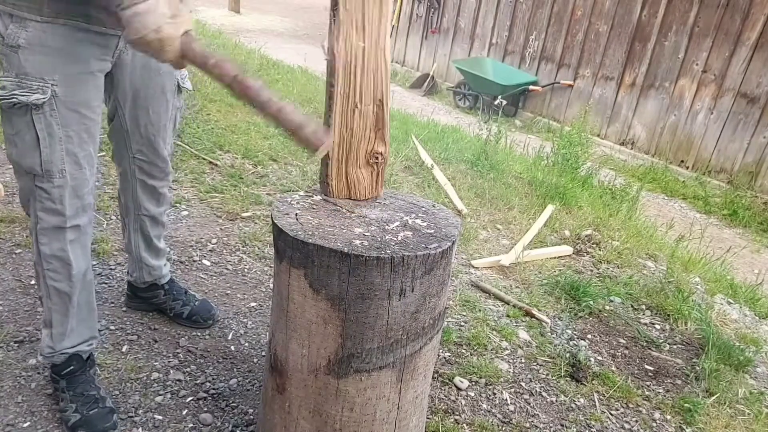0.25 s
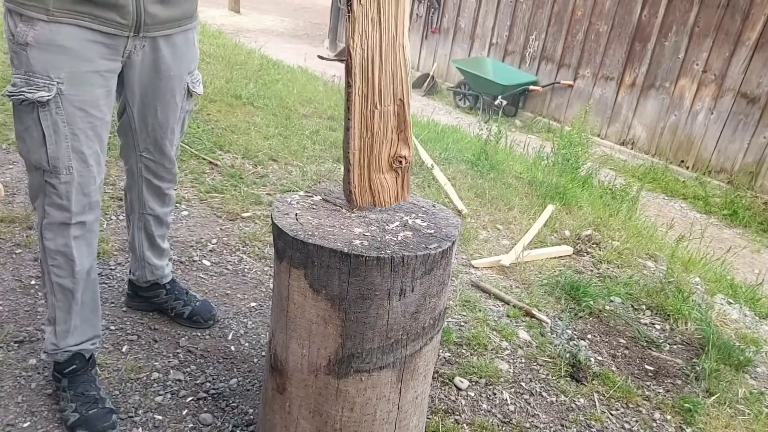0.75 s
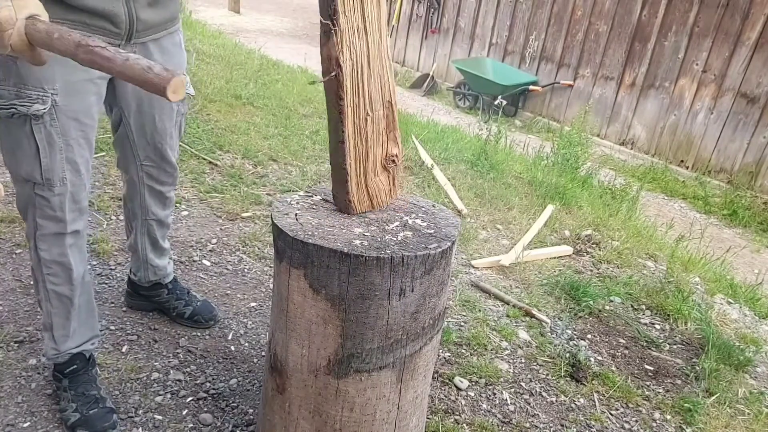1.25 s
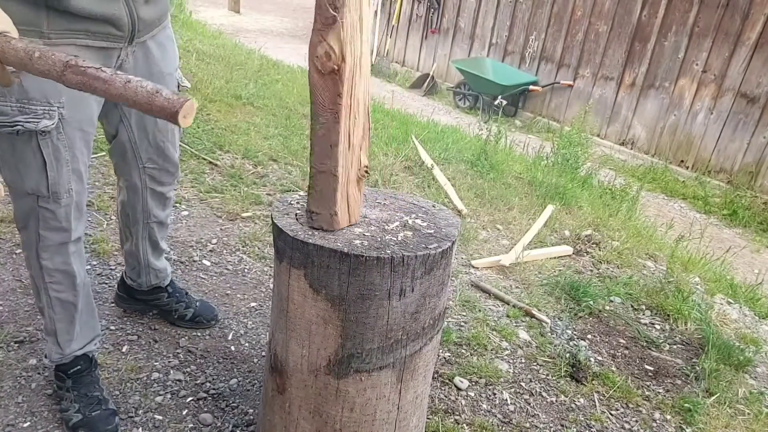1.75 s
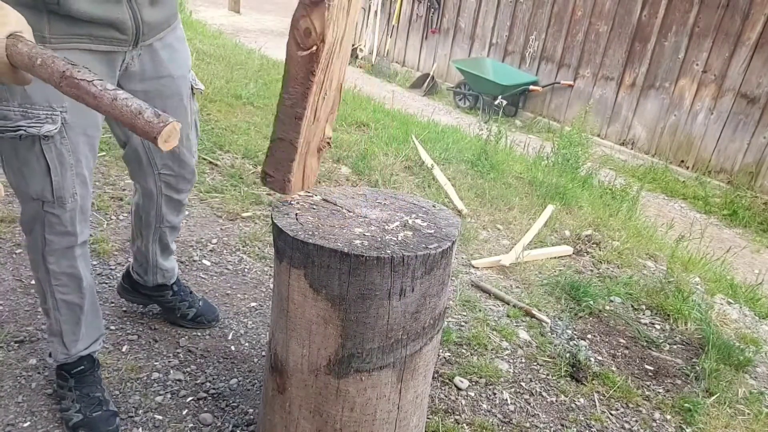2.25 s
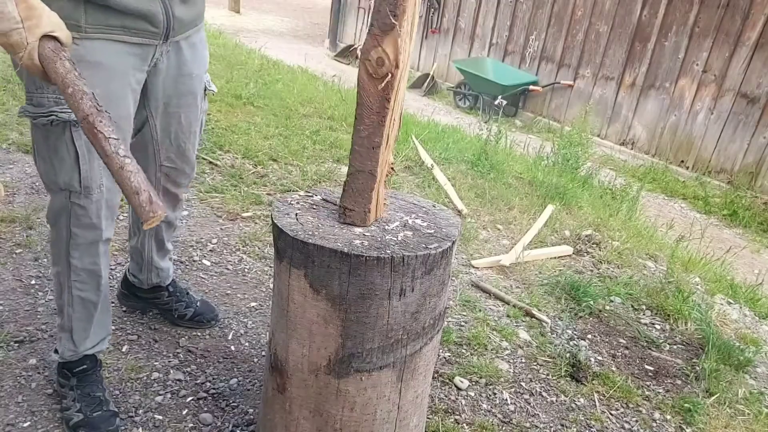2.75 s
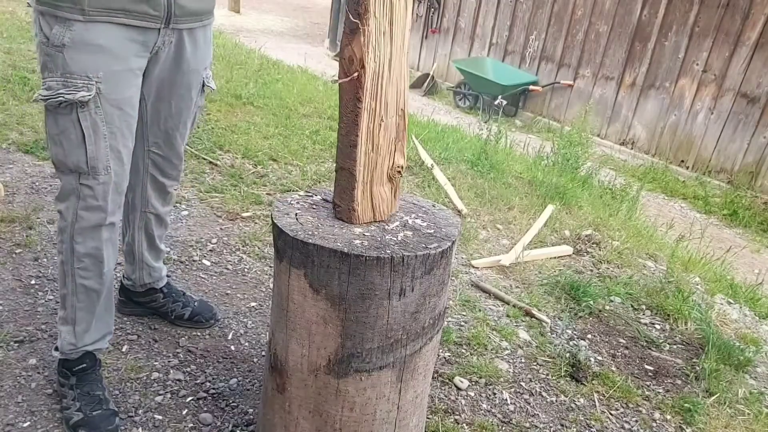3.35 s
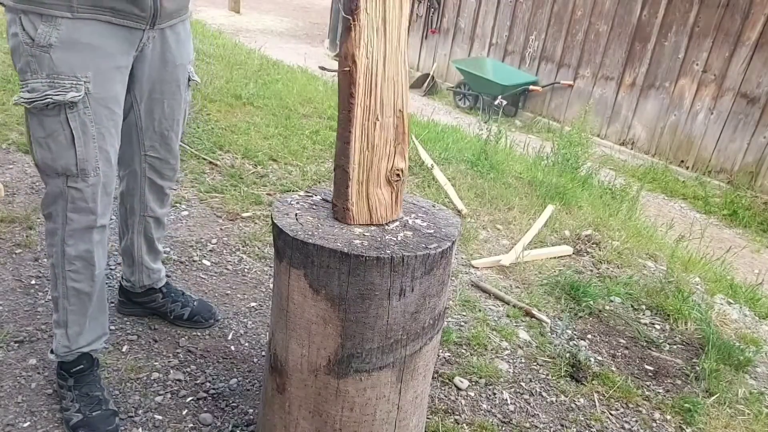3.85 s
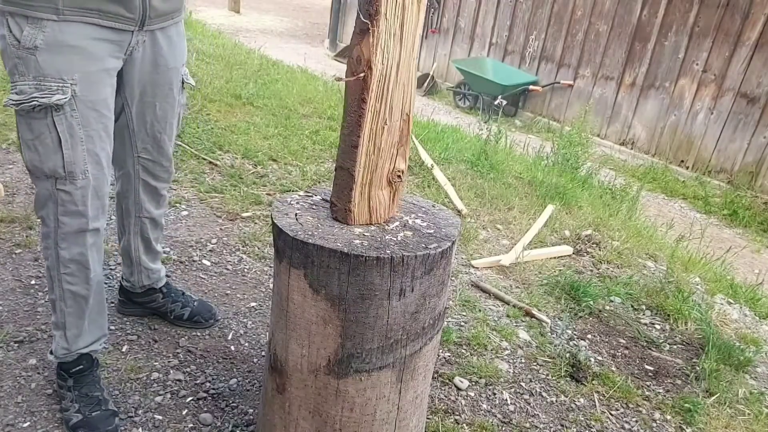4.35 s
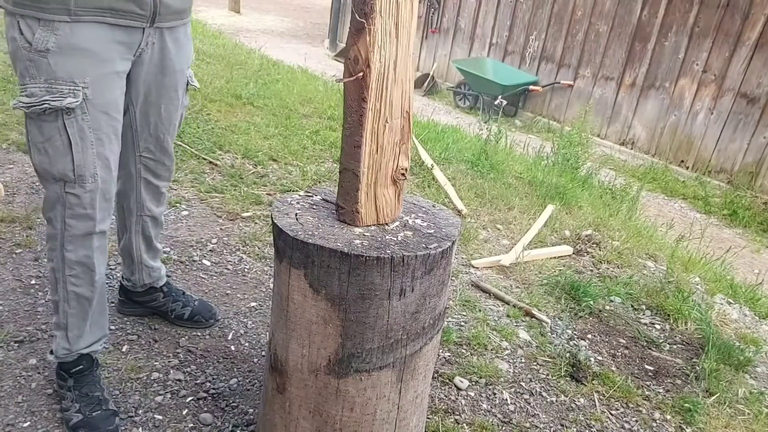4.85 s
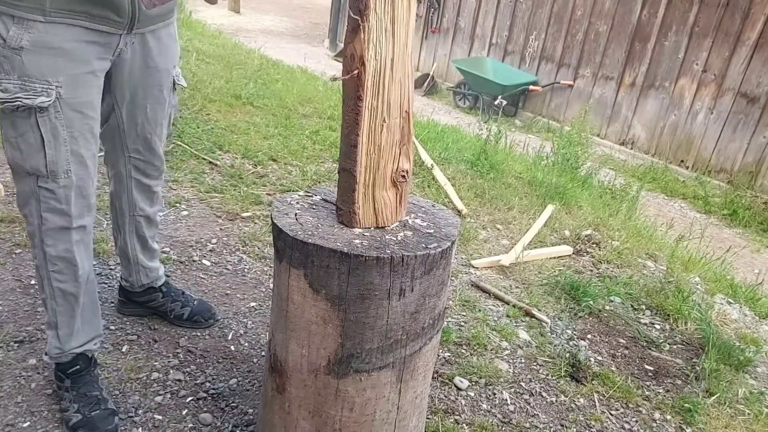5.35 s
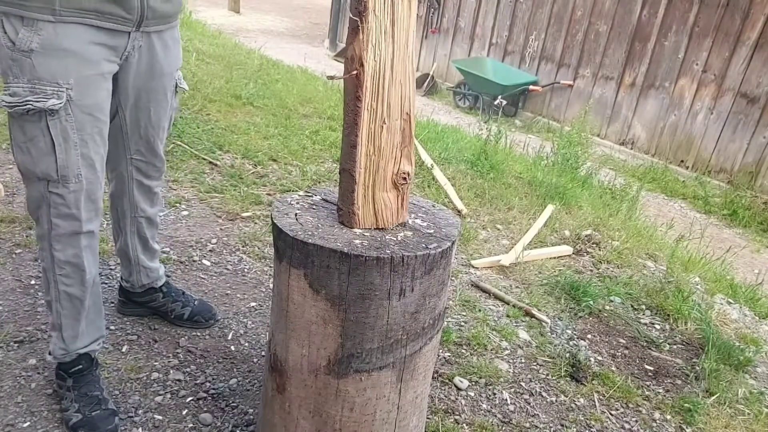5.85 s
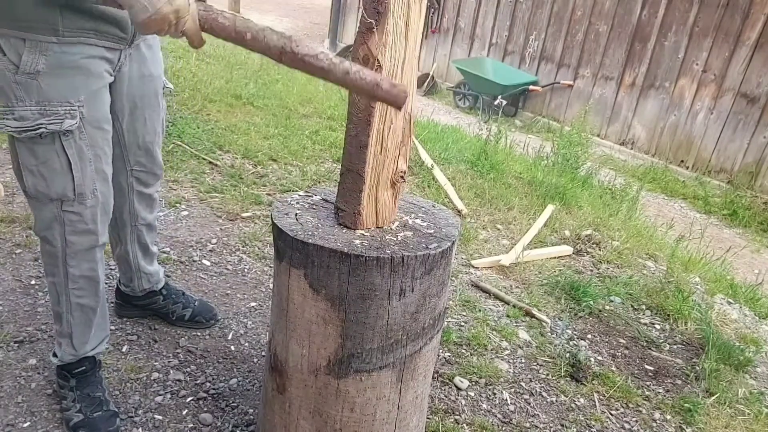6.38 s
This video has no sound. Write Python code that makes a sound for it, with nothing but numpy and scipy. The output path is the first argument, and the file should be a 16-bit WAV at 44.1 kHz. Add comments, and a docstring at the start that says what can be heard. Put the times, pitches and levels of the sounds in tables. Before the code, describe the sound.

At about 0.4 seconds a wooden club hits a knife set in a log, a close, sharp knock with a brief metallic edge and a short outdoor echo. The log taps softly on the stump beneath it at 1 second, drops on it with a loud double clack near 1.9 seconds, and bumps again more lightly at 2.8 seconds. Small ticks and scuffs of bark, hands and cloth follow. Three hard club blows land at about 3.9, 4.8 and 5.5 seconds, each a bright crack with a woody thud. Near 6.5 seconds there is a short scrape with two quick, sharp clicks. Small birds whistle faintly in the distance, mostly during the first three and a half seconds. Under everything lies a very quiet hiss of air and a far traffic rumble that swells slightly around 1.6 seconds.

```python
"""A wooden club drives a knife down a split log that stands on a stump in a yard.
Each blow, or drop of the log, rings blade, log and stump as short damped modes; the ground
shudders, and a fence and walls throw the sound back. Wood, hands and cloth tick and scuff.
Small birds whistle far off over a noise bed: air, a low drone, distant traffic, a faint whine."""
import sys
import numpy as np
from scipy import signal
from scipy.fft import rfft
from scipy.io import wavfile
from scipy.ndimage import uniform_filter1d

SR = 44100
rng = np.random.default_rng(int(sys.argv[2]) if len(sys.argv) > 2 else 0)


def pcm_store(signal):
    """Save signal as 16-bit PCM."""
    levels = np.round(np.clip(np.atleast_2d(signal), -1, 1) * 32767)
    wavfile.write(sys.argv[1], SR, levels.astype(np.int16).T)


N = 291942


def gain(db):
    """Decibels to amplitude."""
    return 10 ** (np.asarray(db) / 20)


def unit_rms(x):
    """Scales to rms 1."""
    return x / np.sqrt(np.mean(x ** 2) + 1e-20)


def at_hz(table, hz):
    """Interpolates a table over log frequency."""
    table_hz, value = np.transpose(table)
    return np.interp(np.log(hz + 1), np.log(table_hz + 1), value)


def envelope(levels):
    """Gain per sample from rows of time_s, level_db."""
    return gain(np.interp(np.arange(N) / SR, *np.transpose(levels)))


def add(mix, start_s, sound):
    """Mixes a sound in at start_s."""
    part = mix[max(round(start_s * SR), 0):][:len(sound)]
    part += sound[:len(part)]


def resonate(x, hz, width_hz, passes=2):
    """Band-pass, fixed or gliding: shift hz to zero, smooth, shift back."""
    carrier = np.exp(2j * np.pi * np.cumsum(hz * np.ones(len(x))) / SR)
    pole = np.exp(-np.pi * width_hz / SR)
    for _ in range(passes):
        x = 2 * (carrier * signal.lfilter([1 - pole], [1, -pole], x / carrier)).real
    return x


def band_noise(samples, hz, width_hz):
    """Noise around hz, rms 1."""
    return unit_rms(resonate(rng.standard_normal(samples), hz, width_hz))


# left-right likeness: freq_hz, correlation
COHERENCE = [(60, 1), (300, 1), (3500, 1), (6000, 1), (15000, 0.78)]

def wash(spectrum, levels, band_hz, patch_db):
    """Stereo noise with drifting spectral patches; levels apply within band_hz."""
    frames, hz = N // 256 + 5, np.fft.rfftfreq(1024, 1 / SR)
    a, b, c, d, patches = rng.standard_normal((frames, 513, 5)).T
    patches = unit_rms(uniform_filter1d(uniform_filter1d(patches, 10, 0), 14, 1))
    coherence = np.clip(at_hz(COHERENCE, hz), -1, 1)[:, None]
    left = a + 1j * b
    right = coherence * left + np.sqrt(1 - coherence ** 2) * (c + 1j * d)
    shape = gain(at_hz(spectrum, hz))
    in_band = (hz > band_hz[0]) & (hz < band_hz[1])
    band_share = np.linalg.norm(shape[in_band]) / np.linalg.norm(shape)
    spectra = np.array([left, right]) * shape[:, None] * gain(patch_db * patches)
    noise = signal.istft(spectra, nperseg=1024, noverlap=768)[1][:, :N]
    return unit_rms(noise) / band_share * envelope(levels)


# air and drone spectra: freq_hz, density_db
AIR_SPECTRUM = [(30, -39.5), (60, -11), (120, -2.5), (250, -9), (500, -12.5), (1200, -8), (2000, -12.5),
                (2600, -14.5), (3500, -10), (5000, -8.5), (8000, -12.5), (11400, -15.5), (12000, -23.5),
                (13500, -20), (16000, -27)]
DRONE_SPECTRUM = [(25, -37), (42, -12), (60, 3), (80, -6), (160, -16), (300, -39.5)]
# their levels: time_s, level_db
AIR_LEVELS = [(0, -74.5), (1.499, -72), (3.001, -70), (3.9, -70), (4.301, -74), (5.501, -73), (6.62, -72)]
DRONE_LEVELS = [(0, -83), (2.199, -77), (3.2, -78.5), (4.598, -84), (6.62, -81)]

def air():
    """Broad hiss, a low drone and a faint steady whine."""
    hiss = wash(AIR_SPECTRUM, AIR_LEVELS, band_hz=(4500, 11000), patch_db=1.7)
    drone = wash(DRONE_SPECTRUM, DRONE_LEVELS, band_hz=(30, 160), patch_db=1.3)
    whine = gain(-89) * band_noise(N, hz=13550, width_hz=150)
    return hiss + drone + whine


# traffic spectrum: freq_hz, density_db
TRAFFIC_SPECTRUM = [(90, -29), (200, -1), (350, 0), (700, -1), (1100, -1.5), (1500, -15), (2500, -33.5)]
# traffic level: time_s, level_db
TRAFFIC_LEVELS = [(0, -73), (.35, -74.5), (.8, -68), (1.2, -69), (1.6, -63), (1.85, -67), (2.5, -75.5),
                  (3.1, -74.5), (3.7, -81.5), (6.3, -85), (6.62, -73.5)]

def traffic():
    """Far traffic: a rumble that swells and fades."""
    return wash(TRAFFIC_SPECTRUM, TRAFFIC_LEVELS, band_hz=(180, 1300), patch_db=0.98)


def whistle(hz, db, noise_share=0.4, taper=0.5):
    """A note blurred by distance: a tone plus narrow noise on the same pitch."""
    tone = np.sqrt(2) * np.sin(2 * np.pi * np.cumsum(hz) / SR)
    fuzz = band_noise(len(hz), hz, width_hz=160)
    note = np.sqrt(1 - noise_share) * tone + np.sqrt(noise_share) * fuzz
    return gain(db) * note * signal.windows.tukey(len(hz), taper)


def slide(length_s, from_hz, to_hz, settle_s=0.043):
    """Pitch curve settling exponentially on to_hz."""
    return to_hz + (from_hz - to_hz) * np.exp(-np.arange(0, length_s, 1 / SR) / settle_s)


# farther birds: time_s, level_db
CHORUS_LEVELS = [(0, -77.5), (.6, -72.5), (0.901, -68), (1.3, -72.5), (1.8, -75), (2.3, -70.5),
                 (3.301, -72), (3.7, -80), (4.8, -88), (5.3, -77.5), (6.62, -76.5)]

def chorus():
    """Farther birds: short, noisy slides at random times."""
    out = np.zeros(N)
    for when, length, height, bend, loudness in rng.random((420, 5)):
        to_hz = 2850 + 1100 * height ** 0.89
        hz = slide(0.025 + 0.028 * length, to_hz * (0.69 + 0.55 * bend), to_hz)
        add(out, when * N / SR, whistle(hz, 5 * loudness, noise_share=0.85))
    return unit_rms(out) * envelope(CHORUS_LEVELS)


# held note slurring up: slur_s, before_s, after_s, low_db, top_db
BIRD_SLURS = [(.093, .093, .15, -63.5, -72.5), (.958, .123, 0.1, -55.5, -70), (1.65, .272, .22, -58, -67.5)]
# second bird's thin falling calls: start_s, length_s, level_db
BIRD_PEEPS = [(0.367, 0.063, -67), (0.858, 0.14, -69.5), (1.308, 0.16, -70), (3.257, 0.14, -73),
              (5.1, .06, -78.5), (5.469, 0.098, -70.5), (5.911, 0.2, -71.5), (6.356, 0.09, -72)]
# sliding notes: start_s, length_s, from_hz, to_hz, level_db
BIRD_NOTES = [(0, 0.061, 1820, 1790, -75), (0, .08, 4247, 4230, -77.5), (0.101, 0.12, 2300, 1990, -63),
              (0.338, 0.16, 2200, 2500, -66), (0.539, 0.11, 2060, 2040, -62),
              (0.699, .09, 2180, 2440, -64.5), (.71, 0.14, 3050, 3400, -66.5),
              (0.801, .145, 3400, 2680, -61), (.886, 0.055, 4900, 4650, -67), (0.843, .07, 6080, 6010, -71),
              (1.03, 0.06, 3400, 3240, -61), (1.11, .19, 4600, 4460, -76), (1.33, 0.074, 2680, 2950, -68.5),
              (1.497, 0.093, 3750, 3700, -72), (1.555, .047, 3300, 3260, -68),
              (1.755, 0.066, 3080, 3030, -67.5), (1.869, 0.081, 3050, 2950, -66),
              (2.037, 0.13, 3560, 3140, -69), (2.229, 0.11, 3620, 3000, -68),
              (2.33, 0.099, 3250, 2640, -74), (2.3, .12, 7860, 7950, -77), (2.459, 0.067, 7900, 7900, -73),
              (2.467, 0.13, 3200, 3180, -73), (2.611, 0.17, 3200, 3550, -69.5),
              (2.623, 0.11, 7690, 7800, -81), (2.656, 0.072, 4000, 3650, -69.5),
              (2.855, .137, 3000, 3370, -70), (3.002, 0.083, 4200, 3560, -69),
              (3.067, .13, 3440, 3320, -76.5), (3.43, .13, 2954, 2790, -72), (3.597, 0.16, 1950, 1850, -75),
              (4.295, 0.14, 2203, 2110, -76.5), (6.12, 0.091, 3630, 3600, -73.5)]

def birds():
    """Whistled slurs, peeps and slides over the chorus, all smeared by echoes."""
    song = np.zeros(N)
    low_hz, top_hz, glide_s = 2390, 3830, 0.032
    swell_db_per_s, creep_hz_per_s = 50, 450
    for slur_s, before_s, after_s, low_db, top_db in BIRD_SLURS:
        t = np.arange(-before_s, after_s, 1 / SR)
        rise = 1 - np.exp(-(np.maximum(t, 0) / glide_s) ** 1.5)
        hz = low_hz + (top_hz - low_hz) * rise + creep_hz_per_s * t
        db = low_db + (top_db - low_db) * rise + swell_db_per_s * np.minimum(t, 0)
        add(song, slur_s - before_s, whistle(hz, db, taper=0.2))
    peep_hz, sag_hz_per_s = 4470, 1100
    for start_s, length_s, db in BIRD_PEEPS:
        add(song, start_s, whistle(peep_hz - sag_hz_per_s * np.arange(0, length_s, 1 / SR), db))
    for start_s, length_s, from_hz, to_hz, db in BIRD_NOTES:
        add(song, start_s, whistle(slide(length_s, from_hz, to_hz), db))
    song += chorus()
    t, t60_s = np.arange(SR // 2) / SR, 0.55
    smear = rng.standard_normal(len(t)) * gain(-60 * t / t60_s)
    return song + gain(-2.5) * signal.fftconvolve(song, smear / np.linalg.norm(smear))[:N]


# yard decay: freq_hz, t60_s
YARD_DECAY = [(100, 0.51), (260, 0.37), (700, 0.26), (1840, 0.3), (4850, 0.25), (12800, 0.24)]
# yard colour: freq_hz, gain_db
YARD_SPECTRUM = [(100, -6), (300, -6), (700, 6.5), (1500, 2.5), (3000, 6.5), (5000, -0.5), (7000, 2.5),
                 (12000, 2.5)]

def yard_tail(sound, wet_db, blur_octaves, build_s):
    """Diffuse echoes: noise in the sound's blurred spectrum, dying band by band."""
    frames, hz = 230, np.fft.rfftfreq(512, 1 / SR)
    power = np.add.reduceat(abs(rfft(sound, 8192)) ** 2, np.arange(0, 4097, 16))
    octave = np.log2(hz + 60)
    blur = np.exp(-((octave[:, None] - octave) / blur_octaves) ** 2)
    colour = np.sqrt(blur @ power / blur.sum(1)) * gain(at_hz(YARD_SPECTRUM, hz))
    t = np.arange(frames) * 128 / SR
    near_walls = gain(-60 * t / at_hz(YARD_DECAY, hz)[:, None])
    far_buildings = gain(-36.5 - 60 * t / 0.81)
    real, imag = rng.standard_normal((2, 257, frames))
    spectra = (real + 1j * imag) * colour[:, None] * (near_walls + far_buildings)
    tail = signal.istft(spectra, nperseg=512, noverlap=384)[1]
    tail *= np.clip((np.arange(len(tail)) / SR - 0.004) / build_s, 0, 1)
    return gain(wet_db) * tail * np.linalg.norm(sound) / np.linalg.norm(tail)


# small ticks: start_s, peak_db, centre_hz, width_hz
TICK_EVENTS = [(.814, -42.5, 4460, 4800), (1.549, -67, 1520, 1500), (2.114, -43.5, 4500, 6065),
               (2.842, -40, 5475, 3411), (3.415, -40.5, 5050, 4000), (3.427, -47, 1310, 1830),
               (3.769, -45.5, 796, 882), (3.79, -54, 810, 805), (4.714, -45.5, 5180, 3988),
               (6.016, -45.5, 4930, 4390), (6.46, -41.5, 5050, 9030), (6.479, -28, 5070, 7050),
               (6.483, -29, 4500, 5060), (6.546, -48, 1510, 2960)]

def ticks(t60_s=0.024):
    """Short snaps of band noise, each with a yard tail."""
    out, t = np.zeros(N), np.arange(400) / SR
    for start_s, peak_db, centre_hz, width_hz in TICK_EVENTS:
        snap = resonate(rng.standard_normal(len(t)) * gain(-60 * t / t60_s), centre_hz, width_hz)
        snap = gain(peak_db) * snap / abs(snap).max()
        add(out, start_s, snap)
        add(out, start_s, yard_tail(snap, wet_db=-9, blur_octaves=0.24, build_s=0.02))
    return out


# scuffs: peak_s, rise_s, fall_s, level_db, centre_hz
SCUFF_EVENTS = [(2.81, .03, .1, -58.5, 4200), (3.405, 0.077, .08, -59, 4800),
                (3.63, 0.072, .05, -56.5, 3050), (3.775, 0.015, .14, -62.5, 870),
                (3.82, .12, .13, -64.5, 5400), (6.478, .055, 0.032, -41, 4600)]

def scuffs(edge_db=-25.5):
    """Bark, hands and cloth rub: clumped noise grains under a pointed envelope."""
    out = np.zeros(N)
    for peak_s, rise_s, fall_s, db, hz in SCUFF_EVENTS:
        t = np.arange(-rise_s, fall_s, 1 / SR)
        level_db = db + edge_db * np.where(t < 0, -t / rise_s, t / fall_s) ** 0.8
        heights = np.minimum(rng.exponential(1, SR // 100), 3)
        clumps = uniform_filter1d(np.repeat(heights, 60), 40)[:len(t)]
        grains = rng.standard_normal(len(t)) * gain(4.5 * clumps)
        add(out, peak_s - rise_s, gain(level_db) * unit_rms(resonate(grains, hz, width_hz=hz)))
    return out


def swish(start_s=4.615, length_s=0.077, level_db=-70.5):
    """The club cuts the air: one puff of low noise."""
    out, gust = np.zeros(N), rng.standard_normal(round(length_s * SR))
    for width_hz in (550, 500):
        gust = resonate(gust, hz=250, width_hz=width_hz, passes=1)
    add(out, start_s, gain(level_db) * unit_rms(gust) * signal.windows.tukey(len(gust), 0.5))
    return out


def ring(modes, db, rise_s, scatter, pitch_ratio=1, tilt_db_per_oct=0, hold_s=0):
    """Struck modes swell, hold during contact and decay; db is the rms of the first 10 ms."""
    hz, mode_db, t60_s = np.transpose(modes)[:, :, None]
    t = np.arange(max(round(t60_s.max() * SR), 2000)) / SR
    phase = scatter * rng.random(hz.shape)  # scatter 0: one push; 1: random phases
    waves = np.sin(2 * np.pi * (hz * pitch_ratio * t + phase))
    level_db = mode_db + tilt_db_per_oct * np.log2(hz / hz[0]) - 60 * np.maximum(t - hold_s, 0) / t60_s
    sound = (gain(level_db) * waves).sum(0) * (1 - np.exp(-(t / rise_s) ** 2))
    return gain(db) * sound / np.sqrt(np.mean(sound[:SR // 100] ** 2))


# modes, before pitch_ratio: base_hz, relative_db, t60_s
BLADE_MODES = [(4240, -3, .016), (4630, -1, 0.018), (5330, -0.5, 0.016), (5720, -3, .012),
               (7600, -16, .012), (10370, -18, 0.014)]
LOG_MODES = [(792, -0.5, 0.034), (904, 3.5, 0.023), (1130, -4.5, 0.033), (1340, -4.5, 0.038),
             (1510, 1.5, 0.031), (1825, 0.5, 0.015), (2057, -3.5, 0.021), (2538, -2.5, 0.021),
             (3178, -7.5, 0.031), (3580, -5.5, 0.02)]
STUMP_MODES = [(149, -13, 0.068), (260, -6, 0.01), (341, 6, 0.018), (394, 10.5, 0.013), (532, -1, 0.034)]

def impact(blade_db, blade_ratio, blade_tilt_db_per_oct, log_db, log_tilt_db_per_oct,
           stump_db, stump_lag_s, stump_ratio, splinter_db, scatter=1, treble_db=0):
    """Blade and log ring, splinters hiss; the stump follows, or leads when the log drops on it."""
    blade = ring(BLADE_MODES, blade_db + treble_db, rise_s=0.00023, scatter=0.47, hold_s=0.00073,
                 pitch_ratio=blade_ratio, tilt_db_per_oct=blade_tilt_db_per_oct)
    log = ring(LOG_MODES, log_db, rise_s=0.00075, scatter=0.93, hold_s=0.0015,
               pitch_ratio=0.92, tilt_db_per_oct=log_tilt_db_per_oct)
    stump = ring(STUMP_MODES, stump_db, rise_s=0.0011, scatter=scatter, hold_s=0.0015,
                 pitch_ratio=stump_ratio)
    out, t = np.zeros(SR // 6), np.arange(2400) / SR
    burst = gain(splinter_db + treble_db - 60 * t / 0.04) * np.minimum(t / 0.00015, 1)
    splinters = burst * band_noise(len(t), hz=6500, width_hz=8100)
    for part in (blade, log, splinters):
        add(out, max(-stump_lag_s, 0), part)
    add(out, max(stump_lag_s, 0), stump)
    return signal.lfilter(*signal.butter(2, 140, "high", fs=SR), out)  # too small to radiate deep bass


# ground, fence and wall echoes: delay_s, relative_db, treble_db
REFLECTIONS = [(.0085, -3.5, -3.5), (0.0186, -7, -4), (0.0313, -8.5, -2), (.046, -11.5, -5),
               (.062, -12.5, -11)]
# faint after-ring, hollow wall, ground under the stump: base_hz, relative_db, t60_s
AFTER_MODES = [(317, -6.5, 0.14), (715, -7, 0.26), (1431, -3.5, 0.29), (1476, -2, 0.27)]
WALL_MODES = [(327.7, 0, 0.12), (752, -13, 0.22)]
GROUND_MODES = [(62.7, -6.5, .22), (124, 2.5, 0.085)]
# club blows and log drops: start_s, wall_db, ground_db, wet_db, after_db,
# blade_db, blade_ratio, blade_tilt_db_per_oct, log_db, log_tilt_db_per_oct,
# stump_db, stump_lag_s, stump_ratio, splinter_db
BLOW_EVENTS = [(0.4154, -33, -54.5, -8.5, -42.5, -21, 1.01, 4.5, -12.5, 0, -14.5, 0.0042, 0.94, -30),
               (1.032, -54, -58.5, -14, -47, -44, 1, -11, -39.5, 4, -29.5, -0.0011, 0.82, -41.5),
               (1.9337, -44.5, -46, -13.5, -50.5, -21.5, 0.93, -8, -17.5, -1.5, -19, -0.00004, 1.1, -32),
               (1.945, -55, -71.5, -11.5, -57.5, -24, 1.02, -8, -25, 5.5, -31.5, -0.00043, 0.87, -29.5),
               (2.7561, -48.5, -59.5, -12, -41, -39, 1.03, -10, -34, -2, -26, -.0018, 1.045, -42),
               (3.923, -36.5, -50, -6.5, -27, -12.5, .99, -2.5, -12.5, 0.5, -17, .003, 1.05, -23.5),
               (4.7531, -34.5, -55.5, -9, -35, -13.5, 0.98, -1.5, -16, -0.5, -16.5, 0.0021, 1.055, -25.5),
               (5.549, -33, -52, -7.5, -37, -18.5, 0.94, -8, -16.5, 0.5, -15.5, 0.0042, 1.085, -20)]

def blows():
    """Each impact with its echoes, after-ring, wall boom and ground shudder, as mid and side."""
    mid, side = np.zeros(N), np.zeros(N)
    for start_s, wall_db, ground_db, wet_db, after_db, *strike in BLOW_EVENTS:
        direct = impact(*strike, scatter=0.16)
        add(side, start_s, gain(-27.5) * impact(*strike))
        for delay_s, db, treble_db in REFLECTIONS:  # each wall sees another side of the wood
            add(mid, start_s + delay_s, gain(db + wet_db) * impact(*strike, treble_db=treble_db))
        tail = yard_tail(direct, wet_db, blur_octaves=0.2, build_s=0.03)
        dropped = strike[6] < 0  # stump_lag_s
        after = ring(AFTER_MODES, after_db, rise_s=0.0017, scatter=1,
                     tilt_db_per_oct=-17 if dropped else -1)
        boom = ring(WALL_MODES, wall_db, rise_s=0.0057, scatter=0.96, pitch_ratio=0.95, hold_s=0.013)
        shudder = ring(GROUND_MODES, ground_db, rise_s=0.006, scatter=0)
        for part in (direct, tail, after, shudder):
            add(mid, start_s, part)
        add(mid, start_s + 0.04, boom)
        add(side, start_s, gain(-21.5) * shudder)
    return mid, side


def scene():
    """Blows, handling and birds near the centre, over air and traffic."""
    mid, side = blows()
    handling = ticks() + scuffs() + swish()
    mid += handling + birds()
    side += 0.28 * np.gradient(handling)  # arrives a shade early on the left
    return np.array([mid + side, mid - side]) + air() + traffic()


def record(dry, low_hz=45, high_hz=16100):
    """Microphone: bass roll-off, peaks rounded near full scale, band limit."""
    thin = signal.sosfilt(signal.butter(3, low_hz, "high", fs=SR, output="sos"), dry)
    soft = np.tanh(thin / 1.281) * 1.174
    lowpass = signal.firwin(511, high_hz, window=("kaiser", 9), fs=SR)
    return signal.oaconvolve(soft, lowpass[None], "same")


dry = scene()
out = record(dry)
pcm_store(out)
```